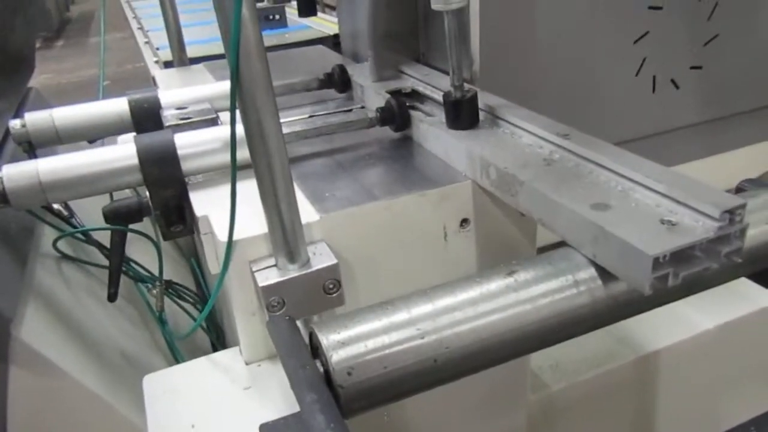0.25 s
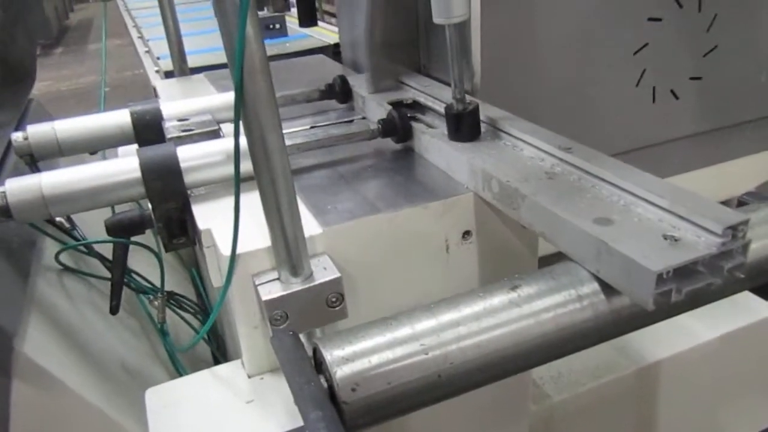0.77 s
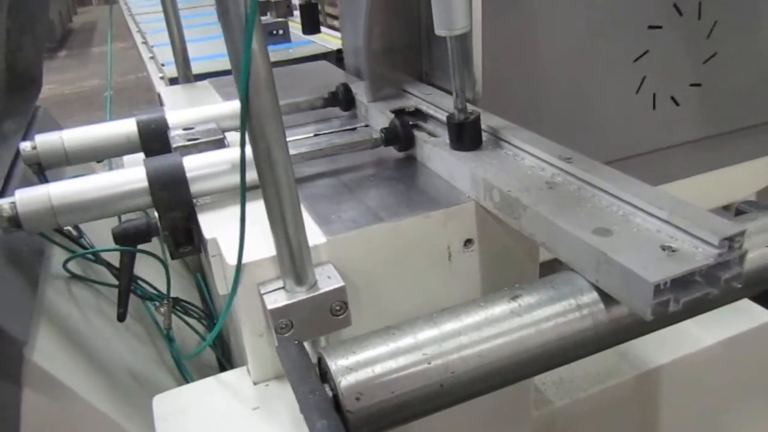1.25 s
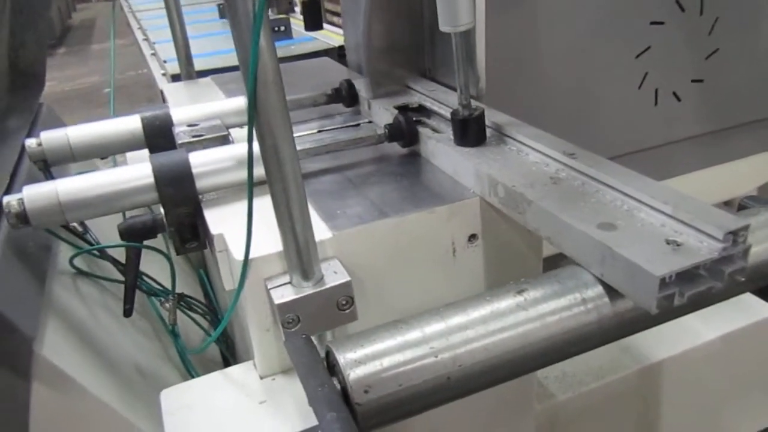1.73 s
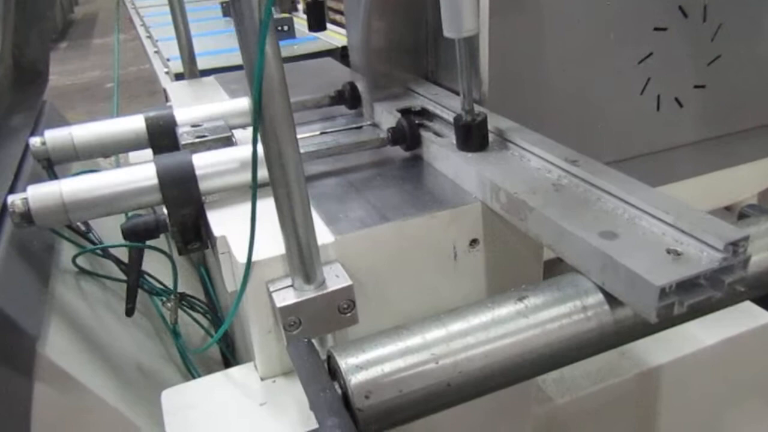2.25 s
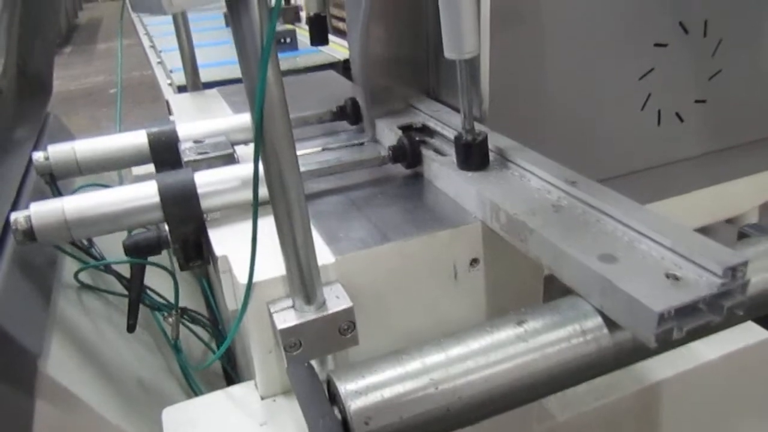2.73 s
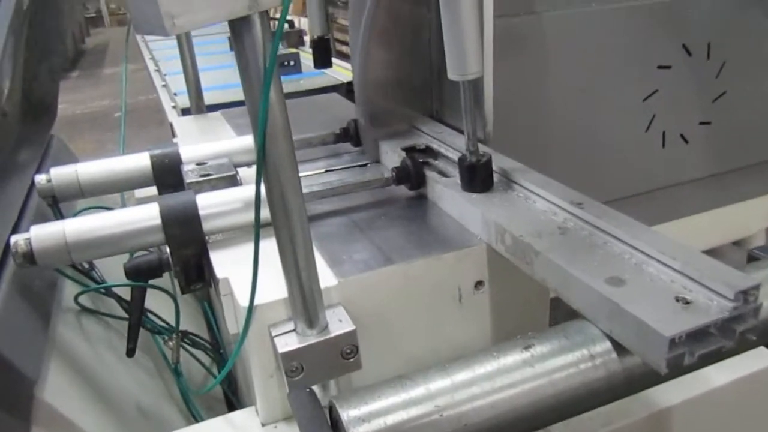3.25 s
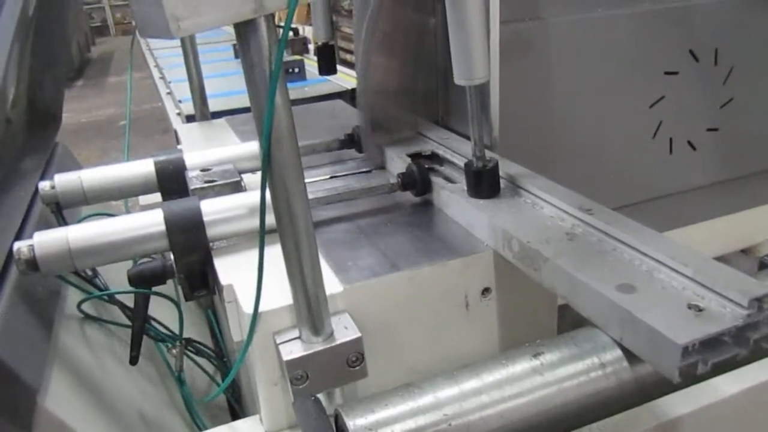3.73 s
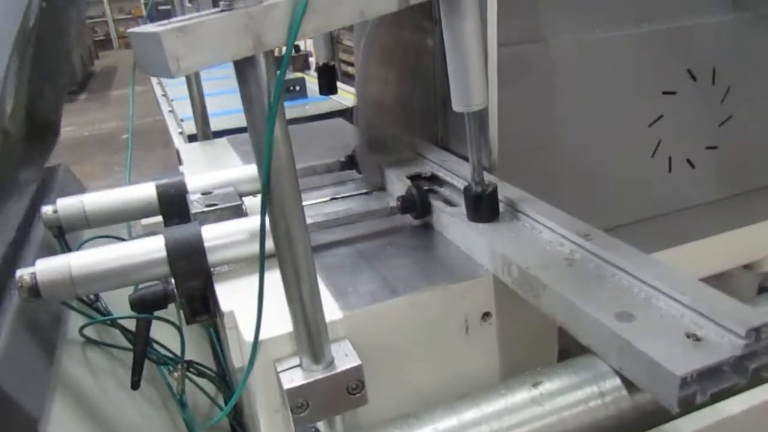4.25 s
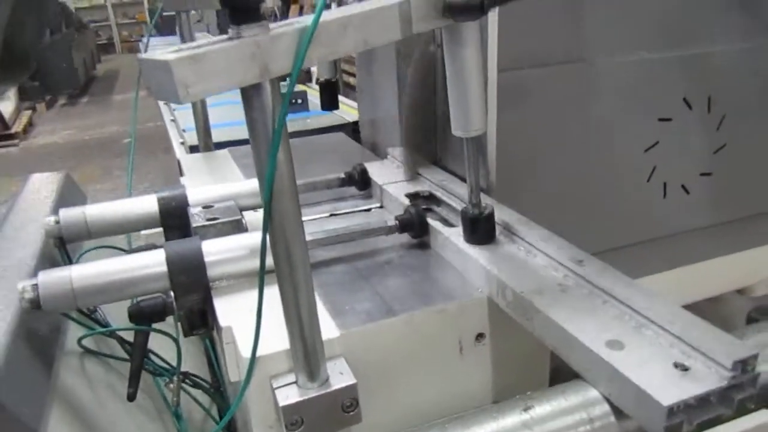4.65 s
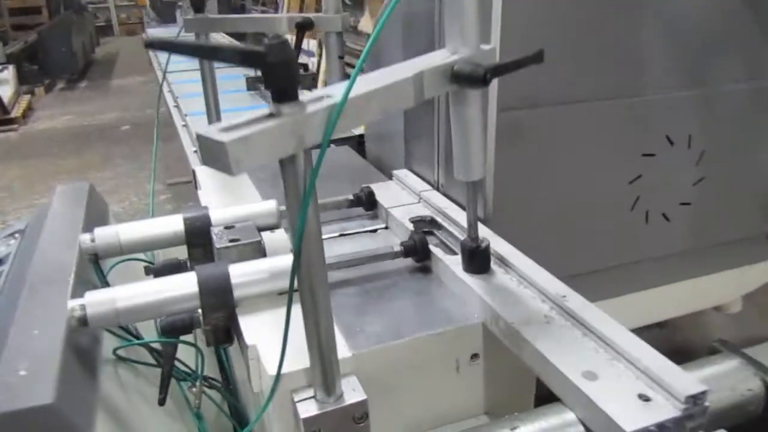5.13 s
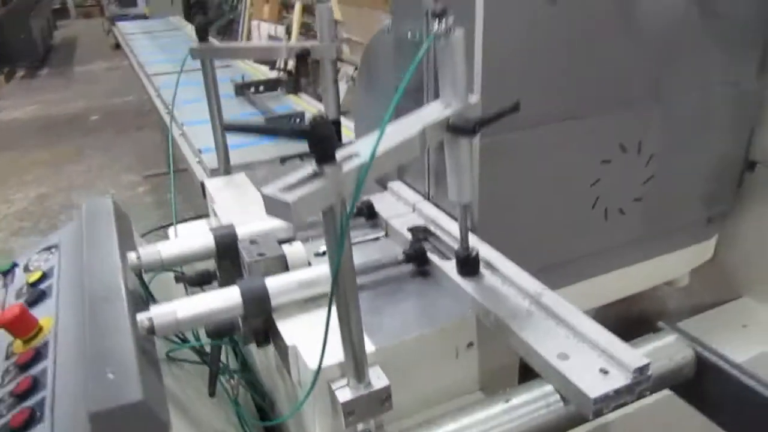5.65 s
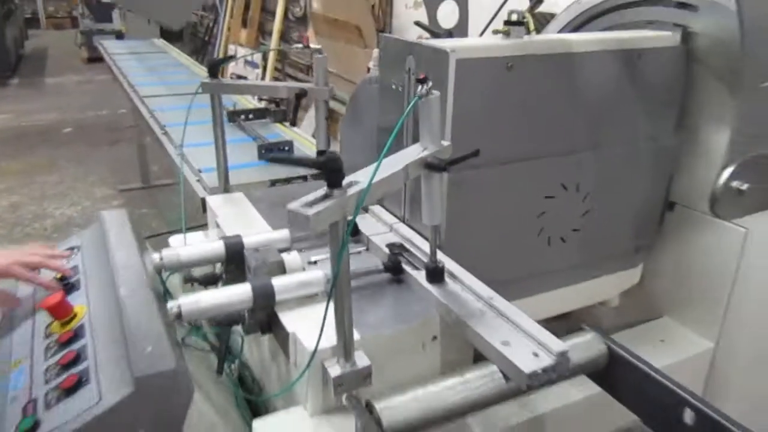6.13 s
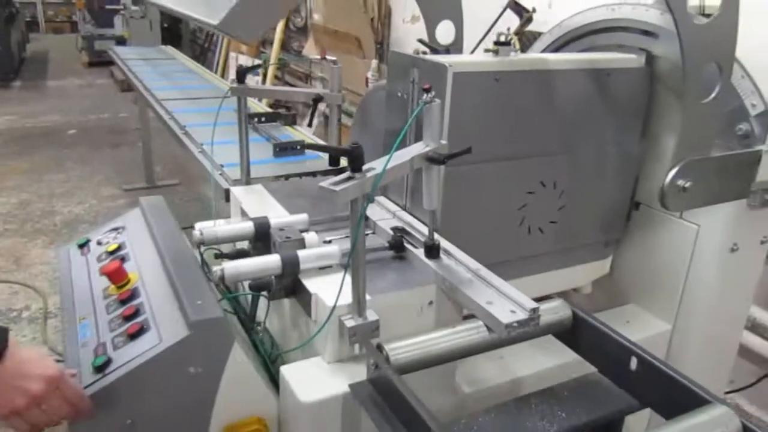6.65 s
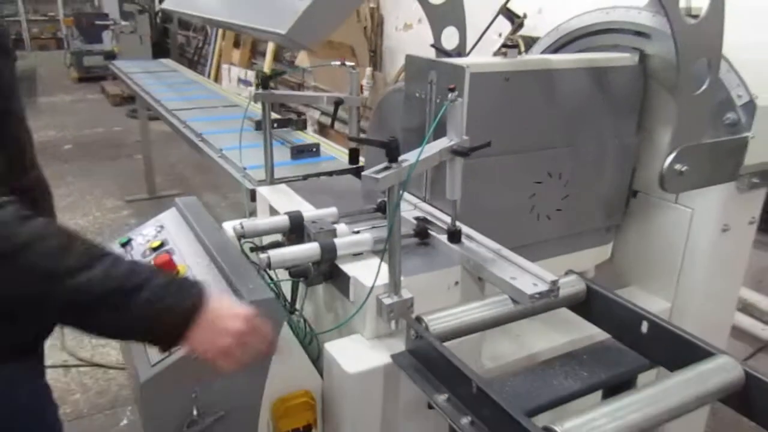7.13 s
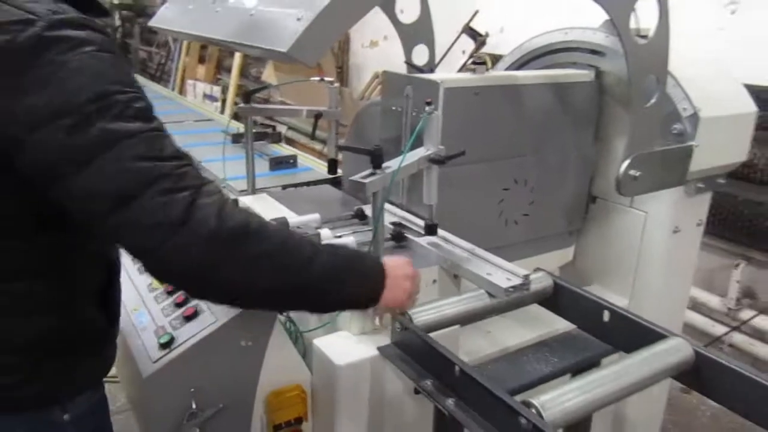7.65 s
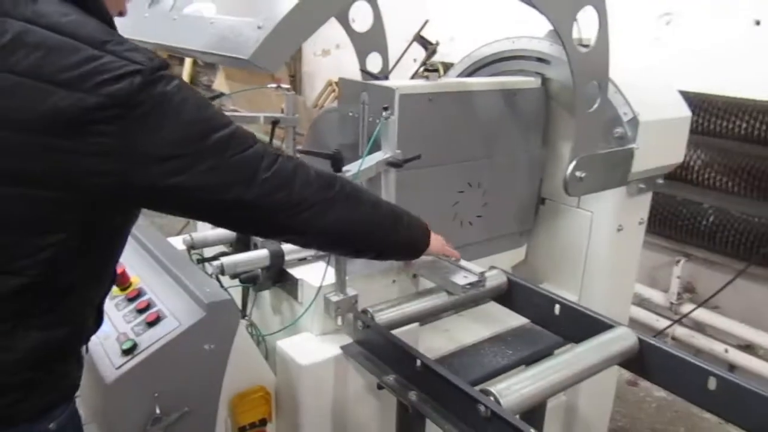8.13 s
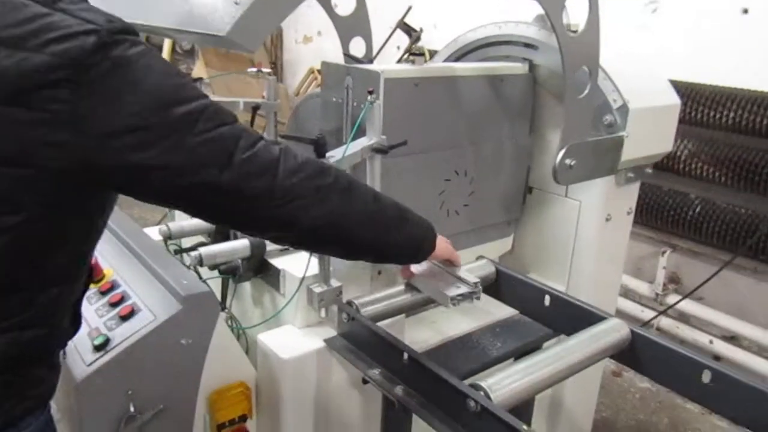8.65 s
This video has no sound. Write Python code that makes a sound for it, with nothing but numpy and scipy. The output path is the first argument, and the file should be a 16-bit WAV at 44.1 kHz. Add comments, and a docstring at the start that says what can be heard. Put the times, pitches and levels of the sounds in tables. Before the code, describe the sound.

Close to a metal-cutting saw, a piercing whine wavers over gritty rasp and ringing metal notes, roughens at the last wall, then drops to broad air hiss and machine rumble. A short bright scrape with two whining catches follows and stops suddenly. Under duller hiss come a soft clamp knock, a tiny sharp click, and a hard clink with a fainter one after it. Workshop setting, centred mono sound.

```python
"""In a workshop a circular saw with 132 teeth finishes its cut through a hollow aluminium profile, regains speed,
brushes the cut face on its way back and falls silent behind its guard. The saw sounds as sines locked to the
shaft, a ragged pattern repeating each turn and notes of the profile. Coloured noise makes the hiss, the rumble
and the brushing; a clamp knocks and clicks in decaying bursts, and the cut piece clinks on the rollers as
decaying modes. Both channels carry the same signal."""
import sys
import numpy as np
from scipy import signal
from scipy.fft import rfft, irfft, next_fast_len
from scipy.io import wavfile
from scipy.ndimage import uniform_filter1d, map_coordinates

SR = 44100
rng = np.random.default_rng(int(sys.argv[2]) if len(sys.argv) > 2 else 0)


def dump_mix(stems):
    """Bounce the given channels to the path in sys.argv[1] as a 16-bit WAV at rate SR."""
    frames = np.atleast_2d(stems).T  # one column per channel
    limited = np.clip(frames, -1, 1)  # hard clip at full scale
    pcm = np.round(limited * 32767).astype(np.int16)
    wavfile.write(sys.argv[1], SR, pcm)


N = 391608
TEETH = 132
SHUT_S = 4.82  # the blade is back in its guard

# Tooth-passing rate under load: (time [s], rate [Hz])
LOADED_SPEED = [(0.03, 6428), (0.2, 6389), (0.3, 6373), (0.4, 6370), (0.6, 6391), (0.7, 6395), (0.85, 6395),
                (1.1, 6415), (1.2, 6420), (1.3, 6422), (1.4, 6415), (1.5, 6389), (1.6, 6375), (1.75, 6370),
                (1.85, 6385)]
# Teeth in metal: (time [s], tooth tone [dB], its octave [dB], rasp [dB])
CUT_LEVELS = [(0, -11, -26, -19), (.12, -12, -35, -14.5), (.18, -14.5, -31, -15.5), (.27, -10.5, -36, -16),
              (.33, -12, -40, -16.5), (.4, -9.5, -29, -21.5), (.7, -8.5, -37, -22), (.93, -8.5, -36, -23),
              (1.01, -10, -29, -23), (1.25, -10.5, -30, -25.5), (1.36, -11, -35, -21.5),
              (1.41, -20, -26, -16), (1.44, -11, -23, -16.5), (1.51, -8, -34, -24), (1.6, -12, -22, -18),
              (1.63, -20, -27, -19), (1.66, -35, -30, -17), (1.72, -20, -31, -15.5),
              (1.77, -11.5, -31, -19), (1.82, -22, -29, -16.5), (1.9, -25, -31, -28), (1.95, -25, -44, -33)]
# Spectrum of the uneven teeth: (frequency [Hz], relative density [dB per Hz])
TOOTH_SPECTRUM = [(410, -32), (700, -26), (1650, -17), (2260, -17), (2470, -17.5), (4220, -3), (4990, -2.5),
                  (6230, -0.5), (6650, -1), (6920, -11.5), (7480, -15), (9090, -22.5), (11000, -12.5),
                  (12100, -25.5), (15700, -31.5)]
# Blade side on the cut face: (time [s], level [dB])
BRUSH_LEVELS = [(4.42, -30), (4.46, -20.5), (4.52, -20.5), (4.6, -16.5), (4.72, -18), (4.815, -20),
                (4.85, -30)]


def amp(db):
    """Logarithmic level: dB to amplitude gain."""
    return 10 ** (np.asarray(db) / 20)


def unit(x):
    """Normalisation to an rms of 1."""
    return x / np.sqrt(np.mean(np.abs(x) ** 2) + 1e-20)


def along(points, hz):
    """Interpolation of (frequency [Hz], value) points on a logarithmic frequency axis."""
    f, v = np.transpose(points)
    return np.interp(np.log(hz + 1), np.log(f + 1), v)


def curves(rows, quiet=None):
    """Linear interpolation in time: one value per sample for each column after the time."""
    s, *cols = np.transpose(rows)
    return [np.interp(np.arange(N) / SR, s, c, quiet, quiet) for c in cols]


def gate(start, end, edge):
    """Linear envelope: 1 between start and end, with a fade of edge seconds centred on each."""
    t = np.arange(N) / SR
    return np.clip(np.minimum(t - start, end - t) / edge + .5, 0, 1)


def during(rows):
    """Smoothed rectangular envelope: 1 while a table lasts, with soft ends."""
    span = [(rows[0][0], 1), (rows[-1][0], 1)]
    return uniform_filter1d(curves(span, quiet=0)[0], size=1200, mode="nearest")


def wobble(rate, size=N):
    """Slow random modulation: a smooth curve through rate random knots a second."""
    knots = rng.standard_normal(int(size * rate / SR) + 4)
    places = np.arange(0, size + 64, 64) * rate / SR
    coarse = map_coordinates(knots, [places], mode="nearest")  # one value every 64 samples
    return np.interp(np.arange(size) / 64, np.arange(len(coarse)), coarse)


def filtered(x, response):
    """Linear filtering: the spectrum of x times a response of frequency."""
    m = next_fast_len(N + 8192)
    return irfft(rfft(x, m) * response(np.fft.rfftfreq(m, 1 / SR)), m)[..., :N]


def treble(x):
    """High-pass filtering: the part above about 7800 Hz."""
    return filtered(x, lambda hz: 1 - 1 / (1 + (hz / 7800) ** 16))


def rush(response, patchy_db):
    """Coloured noise of rms 1, shaped after random gains in patches of time and frequency."""
    z = signal.stft(rng.standard_normal(N), nperseg=512)[2]
    field = uniform_filter1d(rng.standard_normal(z.shape), 6, 0)  # over frequency
    field = uniform_filter1d(field, 12, 1)  # over time
    patchy = signal.istft(z * amp(patchy_db * unit(field)), nperseg=512)[1][:N]
    return unit(filtered(patchy, response))


def band_noise(low_hz, high_hz, order, size):
    """Band-pass filtering of white noise."""
    band = signal.butter(order, [low_hz, high_hz], "band", fs=SR, output="sos")
    return signal.sosfilt(band, rng.standard_normal(size))


def speed():
    """Tooth-passing rate: pulled down by load, then exponential return to free speed, with drag from brushing."""
    free_hz, regain_s, drag_hz_per_s = 6535, .5, 18
    t = np.arange(N) / SR
    out_s, last_hz = LOADED_SPEED[-1]
    regained = free_hz - (free_hz - last_hz) * np.exp(-(t - out_s) / regain_s)
    free = regained - drag_hz_per_s * np.maximum(t - BRUSH_LEVELS[0][0], 0)
    return np.where(t < out_s, curves(LOADED_SPEED)[0], free)


def whine(turns):
    """Additive synthesis: a tone at the tooth-passing rate and its octave, over a low hum at multiples
    of the shaft rate whose level follows the tone."""
    # Hum at 1, 2, 3 .. times the shaft rate: (level at a tooth tone of -10.5 dB [dB])
    hum_levels = [-55, -56, -53, -56, -55, -53, -50, -51, -53, -50, -55, -45, -53, -49, -55, -53, -57, -54]
    # Teeth catching the cut face: (time [s], length [s], tone [dB])
    catches = [(4.488, .065, -20), (4.691, .12, -13.5)]
    idle_db, idle_octave_db, settle_s = -31.5, -30, 0.19  # free blade; octave relative to its tone
    graze_db, touch_octave_db, touch_edge_s = -27, -24, .035  # tone between catches; octave relative to it
    tone_db, octave_db, _ = curves(CUT_LEVELS)
    cut = during(CUT_LEVELS)
    since = np.maximum(np.arange(N) / SR - CUT_LEVELS[-1][0], 0)
    free = (1 - cut) * gate(0, SHUT_S, 0.047)
    waver_db = 2.3 * wobble(3.76)

    def settle(start_db, end_db):
        """Exponential relaxation of the level of the free blade."""
        return free * amp(end_db + (start_db - end_db) * np.exp(-since / settle_s) + waver_db)

    touch = amp(graze_db) * gate(catches[0][0], SHUT_S, touch_edge_s)
    for s, length, db in catches:
        touch = touch + amp(db) * gate(s, s + length, touch_edge_s)
    tone = cut * amp(tone_db) + settle(tone_db, idle_db) + touch
    octave = cut * amp(octave_db) + settle(octave_db, idle_db + idle_octave_db)
    octave = octave + amp(touch_octave_db) * touch

    phase = 2 * np.pi * TEETH * turns + .05 * wobble(67)
    tones = tone * amp(.4 * wobble(39.2)) * np.sin(phase)
    tones = tones + octave * amp(4.5 * wobble(14)) * np.sin(2 * phase)
    hum = np.zeros(N)
    for k, db in enumerate(hum_levels, start=1):
        hum += amp(db + 2.6 * wobble(9)) * np.sin(2 * np.pi * (k * turns + rng.random()))
    hum_gain = cut * amp(0.94 * (tone_db + 10.5))
    return np.sqrt(2) * (tones + hum_gain * hum)


def pattern(turns, memory, lumpy_db):
    """Cyclic repetition: uneven teeth give a ragged pattern that returns each turn and drifts over several."""
    steps = 4096  # samples of the pattern in one turn
    rows, bins = int(turns[-1]) + 2, steps // 2 + 1
    shape = (rows + 40, bins)  # 40 extra turns let the drift settle
    chance = rng.standard_normal(shape) + 1j * rng.standard_normal(shape)
    drift = signal.lfilter([1], [1, -memory], chance, axis=0)[-rows:]
    shaft_hz = LOADED_SPEED[0][1] / TEETH
    colour = amp(along(TOOTH_SPECTRUM, np.arange(bins) * shaft_hz))
    # Groups of teeth that stand proud bite harder
    proud = unit(irfft(drift[:, ::-1] * (np.arange(bins) < 12), axis=1))
    turn = unit(irfft(drift * colour, axis=1) * amp(lumpy_db * proud))
    closed = np.pad(turn, ((0, 0), (0, 1)), "wrap")
    return map_coordinates(closed, [turns, turns % 1 * steps], order=1)


def notes(turns):
    """Resonance: notes ring up in the profile as fluttering sines at multiples of the shaft rate."""
    # Notes: (start [s], end [s], shaft multiple [1], level before pulsing and flutter [dB])
    profile_notes = [(0, .1, 252, -37), (0, .18, 70, -35), (0, .18, 130, -28), (0, .27, 47, -31),
                     (0, .35, 120, -23), (0, .25, 78, -30), (.25, .55, 78, -36), (.1, .35, 198, -38),
                     (.1, .5, 223, -38), (.18, .35, 75, -33), (.18, .4, 122, -23), (.18, .55, 231, -36),
                     (.2, 1.1, 229, -40), (.27, .5, 44, -37), (.27, .5, 66, -35), (.35, .68, 33, -37),
                     (.35, 1, 118, -29), (.35, 1.45, 120, -29), (.45, 1, 146, -39), (.45, 1.45, 129, -29),
                     (.55, 1.25, 144, -36), (.6, 1.45, 133, -33), (.7, 1, 42, -38), (.85, 1.42, 122, -30),
                     (1, 1.5, 228, -40), (1.05, 1.45, 130, -23), (1.35, 1.48, 33, -34),
                     (1.33, 1.75, 198, -36), (1.35, 1.43, 66, -31), (1.35, 1.5, 78, -33),
                     (1.42, 1.68, 54, -35), (1.5, 1.8, 229, -39), (1.56, 1.78, 66, -27),
                     (1.55, 1.75, 42, -33), (1.58, 1.78, 98, -25.5), (1.6, 1.75, 105, -26),
                     (1.6, 1.75, 120, -29), (1.6, 1.8, 84, -28), (1.6, 1.8, 87, -27), (1.6, 1.85, 216, -35),
                     (1.68, 1.82, 129, -27)]
    edge_s, flutter_db = .06, 2.5
    last_wall_s, runout, last_runout = 1.5, .25, .8  # depth (0-1) of the pulse before and in the last wall
    out = np.zeros(N)
    for start, end, k, db in profile_notes:
        span = slice(max(round((start - edge_s) * SR), 0), round((end + edge_s) * SR))
        n = span.stop - span.start
        phase = 2 * np.pi * (k * turns[span] + rng.random()) + .5 * wobble(19.3, size=n)
        # The blade runs out of true, so each note pulses once a turn
        depth = last_runout if start >= last_wall_s else runout
        pulse = 1 + depth * np.cos(2 * np.pi * (turns[span] + rng.random()))
        level = gate(start, end, edge_s)[span] * amp(db + flutter_db * wobble(17.6, size=n))
        out[span] += level * pulse * np.sin(phase)
    return np.sqrt(2) * out


def bite(turns):
    """Chip formation: the tooth pattern with the noise of loose chips, joined by the resonances of the profile."""
    chips_db = -15  # under the pattern
    low_db, high_db, ends_follow = -28.5, -28, 0.42  # levels at a rasp of -20.5 dB; how they follow it [dB per dB]
    through_s, through_fade_s = 1.85, 0.25  # the last wall parts: low and high rasp die away
    level_db = curves(CUT_LEVELS)[2]
    chips = rush(lambda hz: amp(along(TOOTH_SPECTRUM, hz)), patchy_db=1.5)
    cutting = turns[:round((CUT_LEVELS[-1][0] + .1) * SR)]
    teeth = np.resize(pattern(cutting, memory=.94, lumpy_db=3.5), N)
    raw = teeth + amp(chips_db) * chips
    low = filtered(raw, lambda hz: 1 / (1 + (hz / 2500) ** 8))
    high = treble(raw)
    ends = amp(low_db) * unit(low) + amp(high_db) * unit(high)
    ends = ends * amp(ends_follow * (level_db + 20.5)) * gate(-1, through_s, through_fade_s)
    rasp = amp(level_db) * unit(raw - low - high) + ends
    return during(CUT_LEVELS) * rasp + notes(turns)


def air():
    """Broadband flow noise of blade and air line, over noise coloured by the resonances of the machine frame."""
    # Level of the hiss: (time [s], level [dB])
    hiss_levels = [(0, -19), (.4, -24), (1, -25), (1.4, -22), (1.95, -19.5), (2.88, -16), (4.45, -16),
                   (4.84, -24), (6.52, -20.5), (8.1, -15), (8.26, -15), (8.3, -20.5), (8.88, -17.5)]
    # Hiss with the blade out of, then behind the guard: (frequency [Hz], relative density [dB per Hz])
    near_spectrum = [(530, -30.5), (900, -12.5), (1010, -21.5), (1200, -14.5), (1370, -17), (1580, -16),
                     (1780, -9), (1910, -10), (2870, -5.5), (3120, -6.5), (4160, -1), (6330, -4.5),
                     (8030, -28), (10600, -15.5), (15700, -37.5)]
    far_spectrum = [(530, -40), (900, -22), (1030, -27), (1100, -15.5), (1380, -17.5), (1720, -14.5),
                    (1910, -10.5), (2740, -6), (4010, -2), (5480, -7), (6030, -3), (8030, -26),
                    (10600, -17), (13400, -32.5), (15700, -34)]
    # Rumble between the peaks of the frame, then bass: (frequency [Hz], relative density [dB per Hz])
    rumble_spectrum = [(90, -47), (140, -11.5), (300, -4.5), (900, -8.5), (1300, -15.5), (1700, -27),
                       (2800, -120)]
    bass_spectrum = [(15, -52), (25, -22), (38, -9), (102, -5.5), (120, -4), (150, 1), (200, -30),
                     (330, -120)]
    # Resonances of the frame: (centre [Hz], width [Hz], relative level [dB])
    frame_modes = [(170, 40, -8), (250, 40, 0), (300, 12, -2), (360, 22, -4), (415, 50, 0), (540, 30, -3),
                   (635, 40, -4), (720, 35, -2), (815, 35, -7), (905, 50, -3), (970, 45, -7)]
    rumble_db, bass_db = (-15.5, -13), (-48, -31)  # relative to the hiss: blade out of, behind the guard
    hiss_db, = curves(hiss_levels)
    far, = curves([(SHUT_S - .02, 0), (SHUT_S + .02, 1)])
    near_hiss = rush(lambda hz: amp(along(near_spectrum, hz)), patchy_db=0.5)
    far_hiss = rush(lambda hz: amp(along(far_spectrum, hz)), patchy_db=0.55)
    hiss = np.sqrt(1 - far) * near_hiss + np.sqrt(far) * far_hiss  # equal-power crossfade

    def body(hz):
        """Sum of powers: the even floor and each resonance of the frame."""
        peaks = sum(amp(2 * db) / (1 + (2 * (hz - c) / w) ** 4) for c, w, db in frame_modes)
        return np.sqrt(amp(2 * along(rumble_spectrum, hz)) + peaks)

    rumble = rush(body, patchy_db=.7)
    bass = rush(lambda hz: amp(along(bass_spectrum, hz)), patchy_db=3.5)
    lows = amp(np.interp(far, [0, 1], rumble_db) + 0.5 * wobble(3.01)) * rumble
    lows = lows + amp(np.interp(far, [0, 1], bass_db) + 2.7 * wobble(2.225)) * bass
    return amp(hiss_db) * (amp(0.27 * wobble(7)) * hiss + lows)


def brush():
    """Friction noise: on the way back the side of the blade scrapes the cut face."""
    # Colour of the scrape: (frequency [Hz], relative density [dB per Hz])
    scrape_spectrum = [(650, -47), (1100, -11.5), (1790, -12.5), (3030, -14), (4180, -1), (5050, -9),
                       (5770, 1), (6740, -2.5), (7050, -13), (8150, -26), (10100, -13), (13700, -24),
                       (15700, -22)]
    high_db = -10.5  # part above 7800 Hz, relative to the rest
    level_db, = curves(BRUSH_LEVELS)
    scrape = rush(lambda hz: amp(along(scrape_spectrum, hz)), patchy_db=1.0)
    high = treble(scrape)
    balanced = unit(scrape - high) + amp(high_db) * unit(high)
    return during(BRUSH_LEVELS) * amp(level_db) * balanced


def clamp():
    """Damped impact: the clamp gives short band-limited bursts that decay exponentially."""
    # Knocks and click: (time [s], level at onset [dB], centre [Hz], decay by 60 dB [s])
    bursts = [(5.427, -29.5, 750, 0.09), (5.44, -33, 500, .15), (5.45, -38, 200, .3),
              (6.126, -26, 11000, .03)]
    out, t = np.zeros(N + SR), np.arange(SR // 2) / SR
    for s, db, hz, t60 in bursts:
        burst = band_noise(hz * 0.72, hz * 1.2, 2, len(t))
        out[round(s * SR):][:len(t)] += amp(db - 60 * t / t60) * unit(burst)
    return out[:N]


def clinks():
    """Modal synthesis: the loose piece rings on the rollers in decaying modes, each blow starting with a crack."""
    # Blows: (time [s], gain of the ring [dB], gain of the crack [dB], hardness as upper limit of the modes [Hz])
    blows = [(8.262, -18, -5, 9000), (8.367, -21.5, -26, 1950)]
    # Modes of the piece: (frequency [Hz], mean relative level [dB], decay by 60 dB [s])
    modes = [(1170, -13, .4), (1416, -9, .45), (1745, -4, .22), (1960, -1, .18), (2272, -2, .2),
             (2640, -4, .2), (2832, 0, .09), (3060, 0, .08), (3850, -2, .08), (4549, -5, .07)]
    out, t = np.zeros(N + SR), np.arange(SR // 2) / SR
    for s, ring_db, crack_db, hard_hz in blows:
        ring = np.zeros(len(t))
        for hz, db, t60 in modes:
            decay = amp(db + rng.normal(0, 1.2) - 60 * t / t60)
            ring += decay * np.sin(2 * np.pi * hz * t) / (1 + (hz / hard_hz) ** 8)
        crack = amp(crack_db - 60 * t / .06) * band_noise(700, 6500, 4, len(t))
        out[round(s * SR):][:len(t)] += amp(ring_db) * ring + crack
    return out[:N]


def scene():
    """Superposition of all sources, the same in both channels."""
    turns = np.cumsum(speed()) / SR / TEETH  # revolutions of the shaft
    saw = whine(turns) + bite(turns)
    return np.tile(saw + air() + brush() + clamp() + clinks(), (2, 1))


def record(dry):
    """Saturation of the peaks, then a bass cut below about 40 Hz and a band limit."""
    top_hz = 15750
    soft = dry / (1 + np.abs(dry / .8) ** 6) ** (1 / 6)
    return filtered(soft, lambda hz: (hz < top_hz) / (1 + (40 / (hz + 1)) ** 4))


dry = scene()
out = record(dry)
dump_mix(out)
```